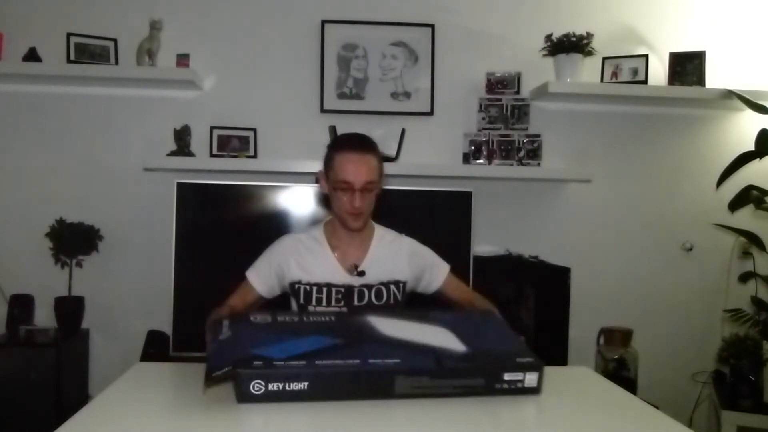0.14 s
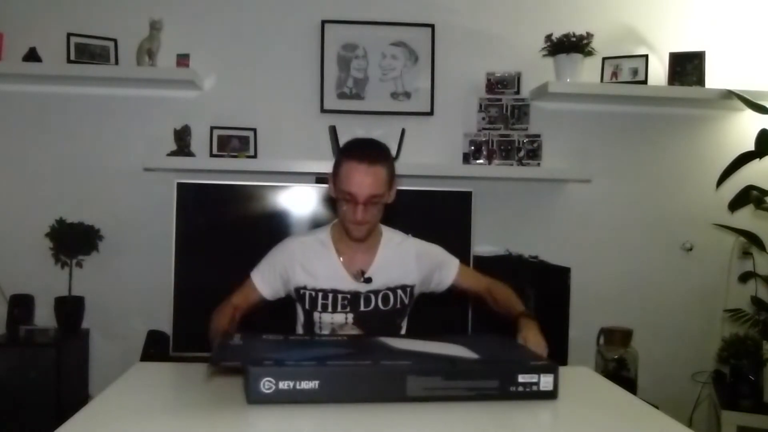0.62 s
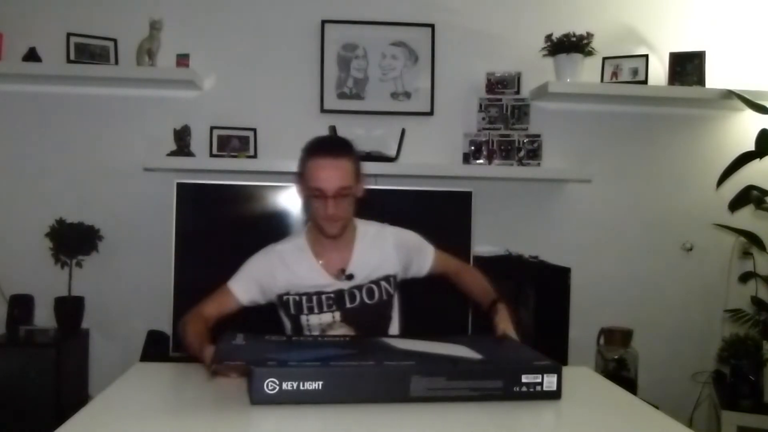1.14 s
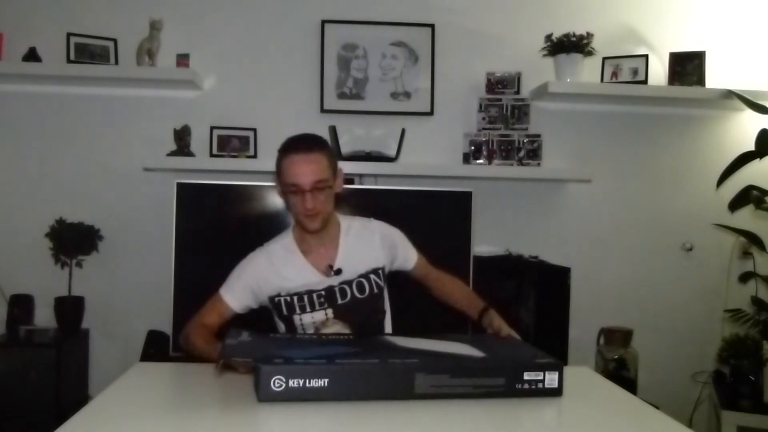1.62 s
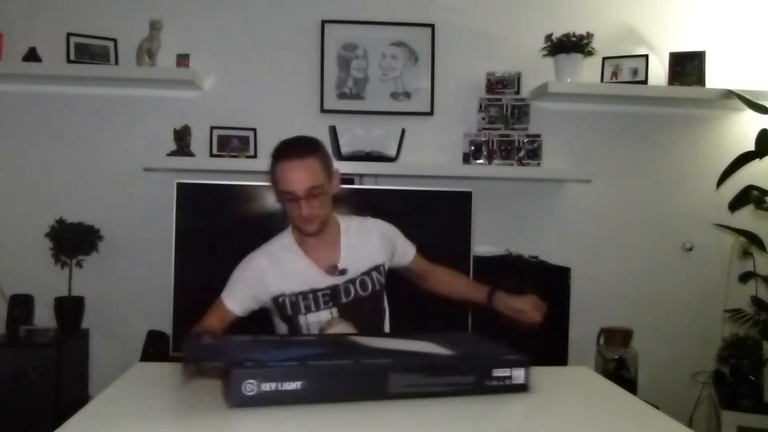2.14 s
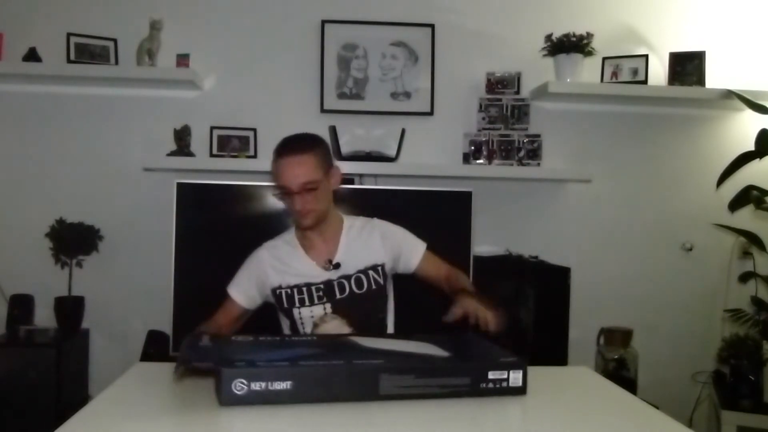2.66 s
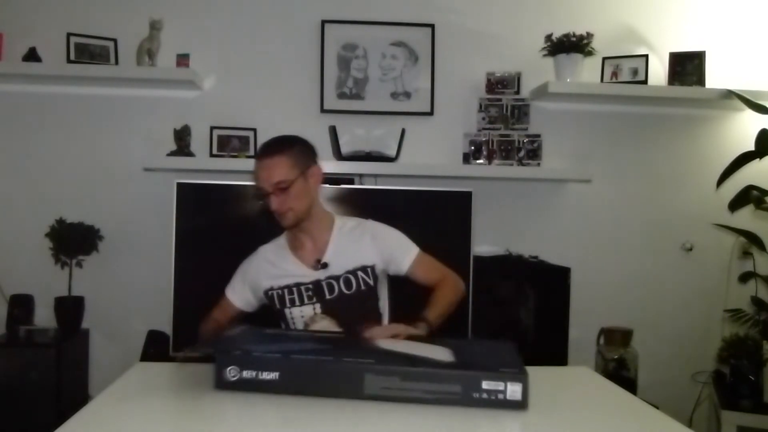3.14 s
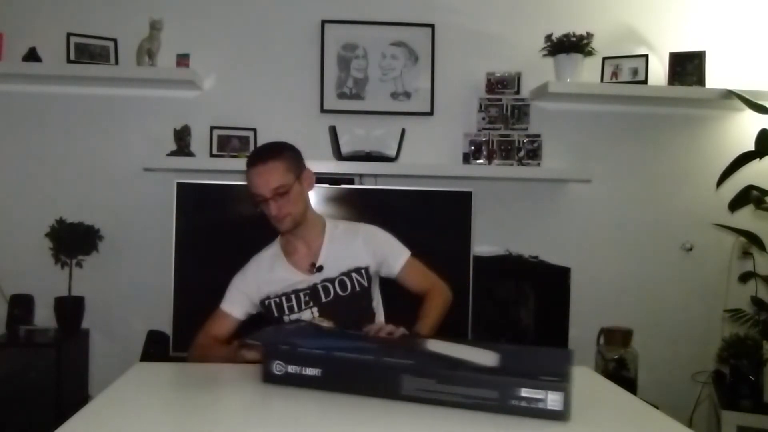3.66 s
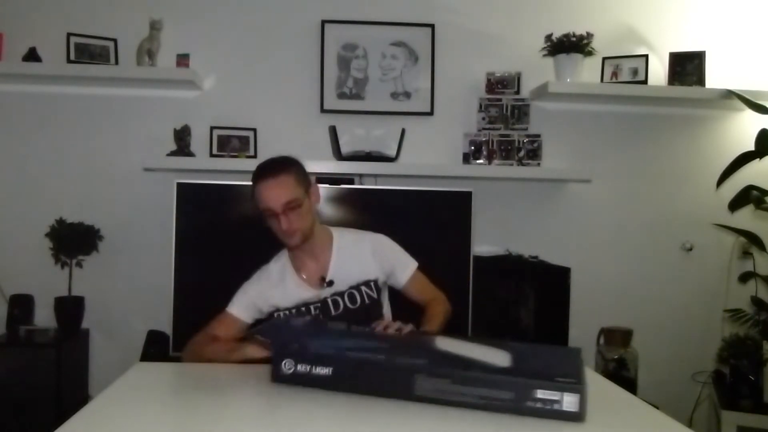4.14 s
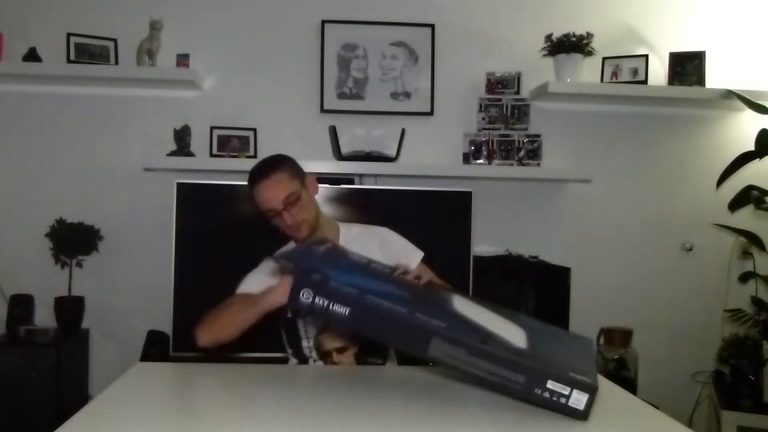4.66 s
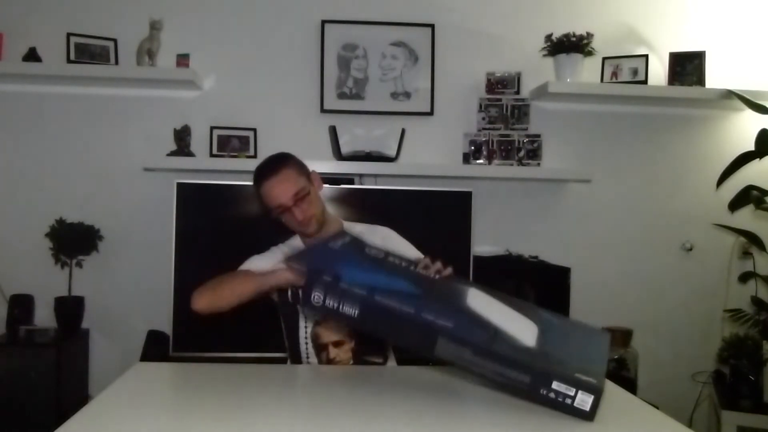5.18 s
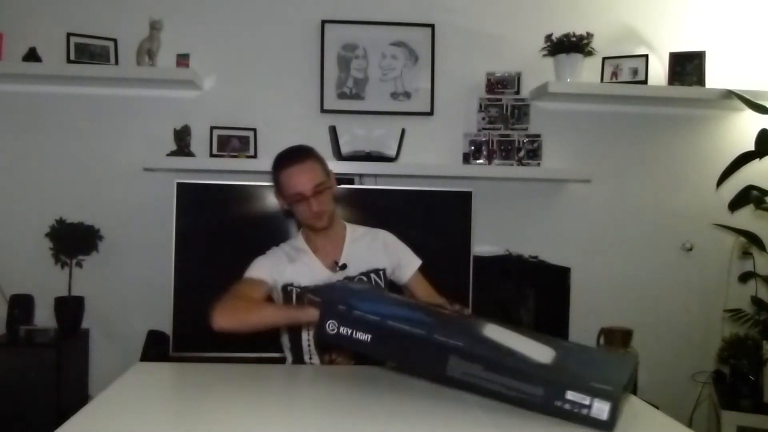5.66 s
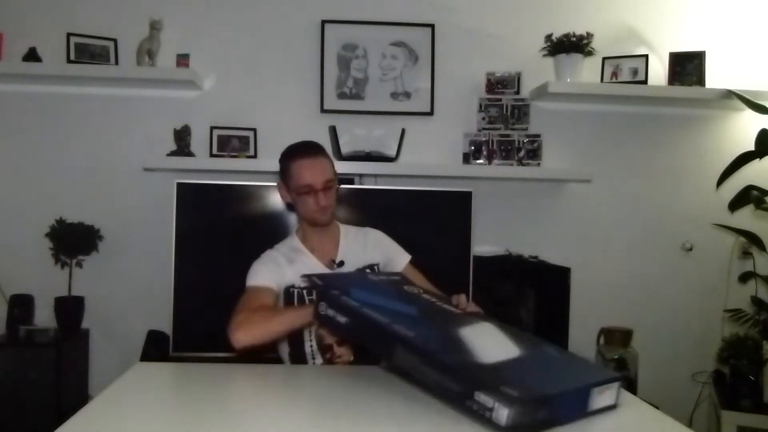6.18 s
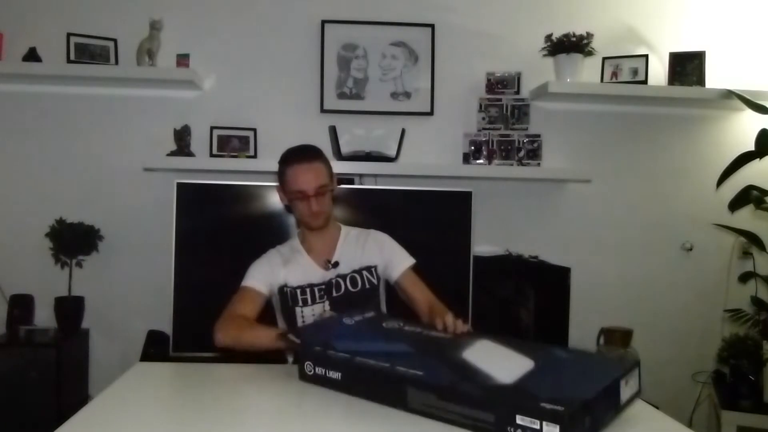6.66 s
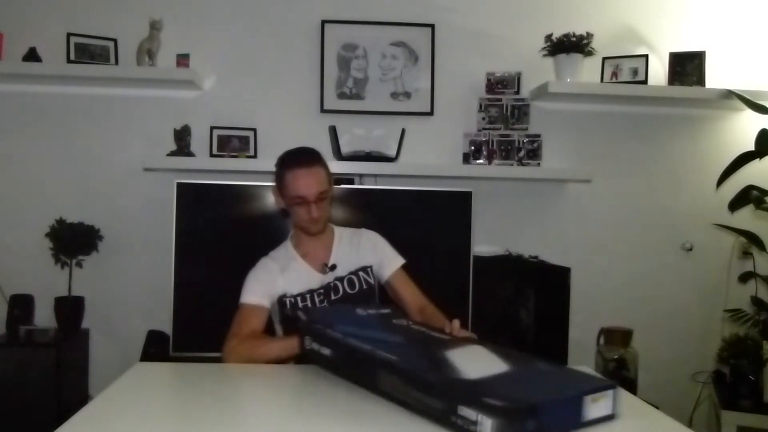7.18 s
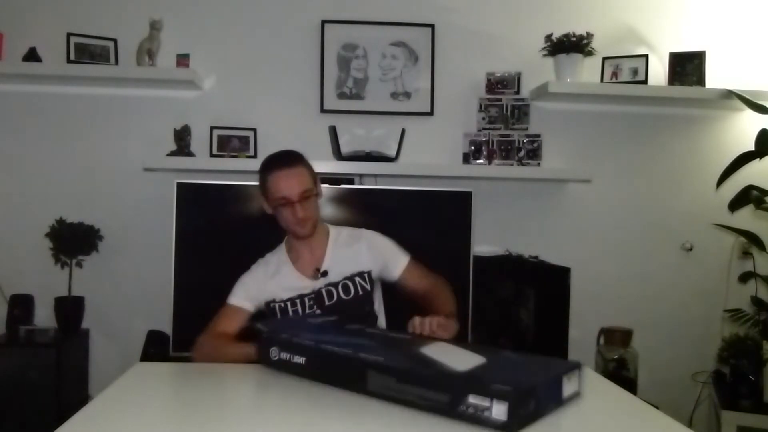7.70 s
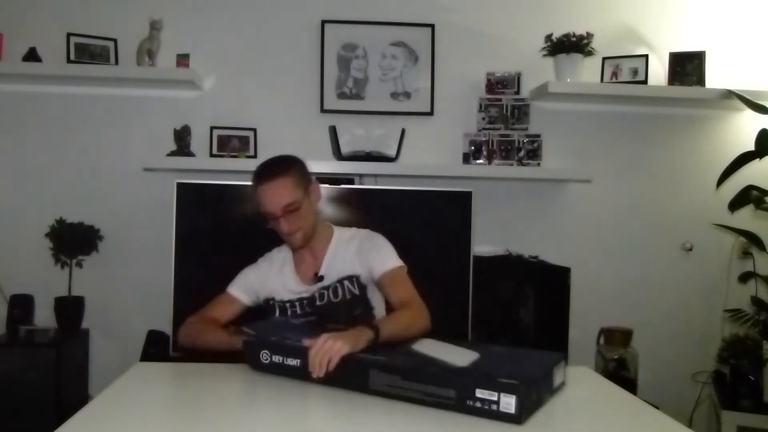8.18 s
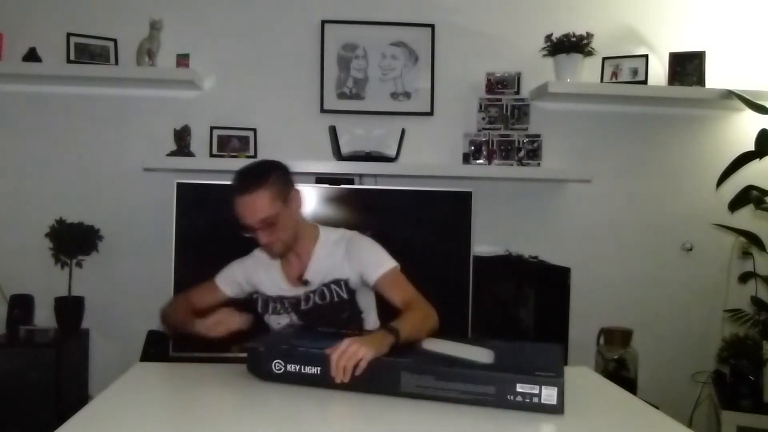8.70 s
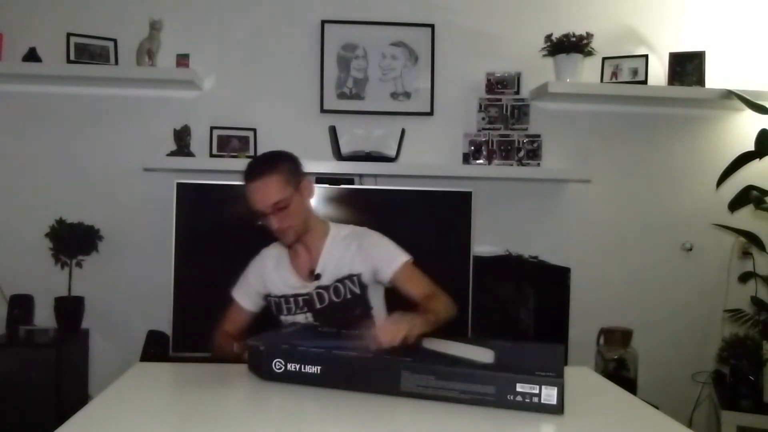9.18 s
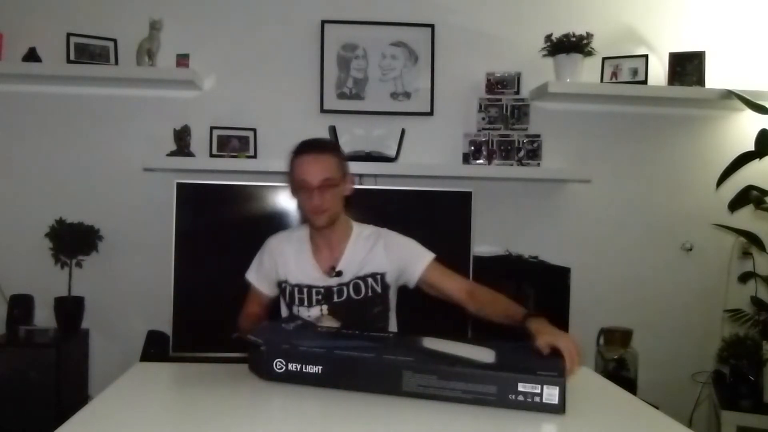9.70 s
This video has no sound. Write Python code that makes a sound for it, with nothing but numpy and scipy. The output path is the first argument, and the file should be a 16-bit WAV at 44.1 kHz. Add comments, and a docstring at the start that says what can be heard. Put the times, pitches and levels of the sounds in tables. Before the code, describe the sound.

A large flat cardboard box is handled on a table, heard close through a small microphone in a softly furnished room with short, faint echo and low hush. At 0 s it lands with a sharp hollow knock and a dry scrape, with lesser knocks at 0.5 s. From 0.7 to 1.9 s only soft rubs and ticks. A double knock comes at 2.0 s, then hissy sliding. Around 3.0-3.5 s taps and skids cluster, with a snap at 3.7 s. After a lull, scuffs and a hard knock at 4.8 s lead to papery skids and knocks at 5.15 and 5.6 s. A loud rasping tug and crack hit at 6.1 s, then knocks at 6.7 s and steady sliding to 8 s. Taps at 8.1-8.3 s precede the loudest event, a heavy hollow multi-part thump at 8.6 s. Quiet taps, scuffs and fading rubs finish by 9.8 s.

```python
"""Knocks, scrapes and skids of a large flat cardboard box laid down, pushed about, tilted and tugged open
on a living-room table; its load thumps down once. Sliding is sparse random catches filtered into rumble,
drone, rasp and hiss. Blows and skids are noise forces that ring the panels, walls, flaps and edges.
A small clip-on microphone close by hears it with a little room and a faint hush."""
import sys
import numpy as np
from scipy import signal
from scipy.io import wavfile

SR = 44100
rng = np.random.default_rng(int(sys.argv[2]) if len(sys.argv) > 2 else 0)


def master_out(mix):
    """Clip the mix to full scale and print it as 16-bit PCM to the path in sys.argv[1]."""
    frames = np.transpose(np.atleast_2d(mix))
    ceiling = np.clip(frames, -1, 1)
    pcm = np.round(ceiling * 32767).astype(np.int16)
    wavfile.write(sys.argv[1], SR, pcm)


def rack_gain(trim_db):
    """Turn a fader trim in dB into the linear factor to multiply a signal by."""
    fader = np.asarray(trim_db, float)
    return 10 ** (fader / 20)


N = 433503


def rms_one(x):
    """Scale to unit rms."""
    return x / np.sqrt(np.mean(x ** 2) + 1e-20)


def drift(rate_hz):
    """Slow random wander of rms 1: noise through two one-pole low-passes at rate_hz."""
    thin = 40  # samples per point of the wander
    warm_up = 2000
    pole = np.exp(-2 * np.pi * thin * rate_hz / SR)
    noise = rng.standard_normal(N // thin + 2 + warm_up)
    slow = signal.lfilter([1], [1, -2 * pole, pole ** 2], noise)[warm_up:]
    return np.interp(np.arange(N) / thin, np.arange(len(slow)), rms_one(slow))


def coloured(streams, spectrum, patchy_db):
    """Half-octave bands of two alternating streams, flickering partly together and partly alone; rms 1."""
    hz, level_db = np.transpose(spectrum)
    octaves = np.log2(hz[-1] / hz[0])
    edges = hz[0] * 2 ** np.arange(0, octaves + .5, .5)
    together = drift(8.3)
    out = np.zeros(N)
    for k, (low, high) in enumerate(zip(edges, edges[1:])):
        band_pass = signal.butter(2, [low, high], "band", fs=SR, output="sos")
        # neighbouring bands get unrelated input
        band = signal.sosfilt(band_pass, streams[k % 2])
        centre_db = np.interp(np.log(low * high) / 2, np.log(hz), level_db)
        flicker_db = patchy_db * (0.78 * together + drift(11.5))
        out = out + band * rack_gain(centre_db + flicker_db)
    return rms_one(out)


def room_hush():
    """The hush of the room: steady noise, strongest in the bass."""
    # Spectrum of the hush. Each row: frequency in Hz, level per Hz in dB.
    spectrum = [(40, -5), (100, -0.5), (300, -2.5), (1000, -17.5), (3000, -21), (7000, -34), (11000, -30)]
    return rack_gain(-68.5) * coloured(rng.standard_normal((2, N)), spectrum, patchy_db=0.5)


def room(x):
    """A dense cloud of echoes from 9 ms on; soft furnishings leave its treble weaker, all at one decay rate."""
    bass_t60_s, treble_t60_s = 0.37, 0.37
    treble_db, split_hz = -8, 1280
    t = np.arange(round(.6 * SR)) / SR
    cloud = rng.standard_normal(len(t)) * (t > .009)
    bass = signal.sosfilt(signal.butter(1, split_hz, fs=SR, output="sos"), cloud)
    treble = cloud - bass
    tail = bass * rack_gain(-60 * t / bass_t60_s) + treble * rack_gain(treble_db - 60 * t / treble_t60_s)
    return signal.fftconvolve(x, tail / np.sqrt(np.sum(tail ** 2)))[:N]


def fibres(per_s, size_db):
    """Two streams of tiny stick-slip catches of uneven size and random sign."""
    caught = rng.random((2, N)) < per_s / SR
    unevenness = np.minimum(rng.exponential(1, (2, N)), 5)
    sizes = rack_gain(size_db * unevenness) * rng.choice([-1, 1], (2, N))
    return caught * sizes + 1e-9


def strokes():
    """Pushes and tugs, some overlapping, some with pauses between: rasp gain, hiss gain, swing in dB."""
    # Slides of card. Each row: start in seconds, length in seconds, rasp level in dB,
    # swell from start to end in dB, gloss (skin hiss over rasp) in dB.
    slides = [(0.0, 0.41, -47.5, -4, -3), (0.452, 0.35, -53, 0.5, -5), (0.784, 0.38, -62, -9, -8.5),
              (1.135, 0.28, -62.5, 1, -8), (1.3, 0.1, -57.5, 2, -5), (1.399, .25, -54, -5.5, -4.5),
              (1.691, 0.23, -55.5, 10, -6.5), (2.043, 0.26, -48.5, -9, -1), (2.324, 0.11, -51.5, 3, -10.5),
              (2.464, 0.13, -65, -13, -3), (2.53, 0.46, -50, 4.5, 0.5), (3.004, 0.16, -52, 0, 1),
              (3.112, 0.25, -47, 1.5, 2), (3.29, 0.21, -47, -1, -1.5), (3.405, 0.41, -50, -3, 1),
              (3.85, 0.091, -49.5, -13, -13), (4.09, 0.24, -56, -1.5, -2.5), (4.4, 0.4, -68, 10, -9),
              (4.669, 0.26, -54, 10, -10.5), (4.84, 0.29, -60.5, 5, -5), (5.09, 0.26, -55, -7, -9.5),
              (5.362, 0.33, -59.5, -9, -4), (5.588, 0.24, -43, -2.5, -4), (5.77, 0.29, -47.5, 7, 0.5),
              (6.009, 0.13, -34.5, 14.5, -9.5), (6.143, 0.26, -46.5, 3, -4), (6.36, 0.2, -41, -1.5, -6),
              (6.503, 0.18, -52.5, -8, -3), (6.647, 0.55, -53, -13.5, -7), (6.915, 0.23, -47, 3, -2),
              (7.093, 0.37, -45, 1, -1.5), (7.46, 0.29, -49.5, -8, -1), (7.696, .26, -45.5, -6.5, -3.5),
              (7.964, 0.18, -51, -2, -12), (8.146, 0.14, -49, 6, -2.5), (8.332, 0.25, -50.5, -7, -1.5),
              (8.572, 0.13, -37.5, 5, -5), (8.728, 0.18, -62, -15, 9), (9.03, 0.1, -68.5, 3, -7),
              (9.29, 0.09, -57, 4, -16), (9.395, 0.58, -59.5, -11, -11.5)]
    grip_s, let_go_s = 0.041, 0.073  # longest pick-up and dying-away times
    edge_drop_db = 9  # how far a slide is down at its start and end
    rest_db = -81.5  # faint creep of card between slides
    t = np.arange(N) / SR
    rasp, hiss, shape = rack_gain(rest_db), rack_gain(rest_db), rack_gain(-2 * edge_drop_db)
    for start, length, db, swell_db, gloss_db in slides:
        grip, let_go = min(grip_s, length / 3), min(let_go_s, length / 2)
        rise, fall = (t - start) / grip, (start + length - t) / let_go
        # 0 at the start and end, 1 in full motion; the fades run on a little outside
        moving = np.clip(np.minimum(rise, fall), -2, 1)
        edge = rack_gain(edge_drop_db * (moving - 1)) * (moving > -2)
        progress = np.clip((t - start) / length, 0, 1)
        level = edge * rack_gain(db + swell_db * (progress - .5))
        rasp = np.hypot(rasp, level)
        hiss = np.hypot(hiss, level * rack_gain(gloss_db))
        shape = np.maximum(shape, edge)
    return rasp, hiss, 20 * np.log10(shape)


def sliding():
    """Catching fibres shake the table, the hollow walls, the flutes and the skin of the card."""
    # How hard the box bears on the table, before the lows follow the slides.
    # Each row: time in seconds, wall drone in dB, table rumble over drone in dB.
    bearing = [(0.0, -52.5, -18), (.6, -57.5, -10), (1.1, -63, -15), (1.9, -65, 2.5), (2.3, -56.5, -3),
               (2.9, -61, -13), (3.3, -60, 0), (3.9, -67.5, -10), (4.25, -63.5, 12), (4.6, -65.5, -6),
               (5.1, -58, 6.5), (5.65, -59, 0), (6.1, -49.5, -12.5), (6.5, -54, -14), (6.87, -54, -1),
               (7.3, -55, -14.5), (7.9, -62, -4), (8.4, -59.5, -5), (8.65, -50, 0), (8.95, -64.5, -8),
               (9.4, -54, -1), (9.83, -63.5, 2.5)]
    # Friction colours of table, walls, flutes and skin. Each row: frequency in Hz, level per Hz in dB.
    rumble_colour = [(30, -13), (50, -1.5), (100, -2.5), (200, -2.5), (320, -42)]
    drone_colour = [(140, -18.5), (260, -3.5), (500, -3), (800, -5), (1200, -11)]
    rasp_colour = [(600, -19.5), (1000, 0), (1700, 0), (2500, 2.5), (3600, -13.5)]
    hiss_colour = [(2000, -27), (3300, 8.5), (5000, 6), (7000, 3.5), (9000, -6), (11000, -15)]
    lows_follow = 0.37  # share of a slide's rise and fall (in dB) that drone and rumble follow

    rasp_gain, hiss_gain, shape_db = strokes()
    s, wall_db, table_db = np.transpose(bearing)
    t = np.arange(N) / SR
    drone_db = np.interp(t, s, wall_db) + lows_follow * shape_db
    rumble_db = drone_db + np.interp(t, s, table_db)

    rumble = coloured(fibres(150, 6.6), rumble_colour, patchy_db=4.5)
    drone = coloured(fibres(900, 3.17), drone_colour, patchy_db=2.0)
    rasp = coloured(fibres(5000, 3.3), rasp_colour, patchy_db=2.0)
    hiss = coloured(fibres(15000, 3.87), hiss_colour, patchy_db=1.23)
    return rack_gain(rumble_db) * rumble + rack_gain(drone_db) * drone + rasp_gain * rasp + hiss_gain * hiss


def ring(modes, t):
    """Decaying sines of one box part: strengths and pitches vary by chance; neighbours swing oppositely."""
    detune, strength_spread_db = .06, 2.5  # the grip shifts each pitch by this fraction (one sigma)
    hz, level_db, t60 = np.transpose(modes)[:, :, None]
    strength_luck, pitch_luck = rng.standard_normal((2, len(modes), 1))
    sign = (-1.) ** np.arange(len(modes))[:, None]
    height = sign * rack_gain(level_db + strength_spread_db * strength_luck - 60 * t / t60)
    sound = np.sum(height * np.sin(2 * np.pi * hz * (1 + detune * pitch_luck) * t), axis=0)
    # each part of the box radiates little outside the span of its own modes
    span = [.6 * hz.min(), 1.6 * hz.max()]
    return signal.sosfilt(signal.butter(2, span, "band", fs=SR, output="sos"), sound)


def contacts(rows, force):
    """Each contact force excites the four families of modes in panels, walls, flaps and edges."""
    # What the box rings with. Each row: frequency in Hz before detuning, relative level in dB,
    # t60 in seconds.
    panels = [(49.3, -2.5, 0.18), (69.5, 3.5, 0.074), (89, -5, .08), (126, 15, 0.024), (152, -13, 0.078),
              (177, 6, 0.028)]
    walls = [(235, -5, .035), (280, -5, .032), (355, -3, .03), (460, -1, .028), (545, 0, .027),
             (700, 0, .024)]
    flaps = [(820, -3, .016), (920, -2, .015), (1100, 0, .014), (1280, 0, .012), (1450, 0, .011),
             (1640, 0, .01)]
    edges = [(2000, 0, .006), (2400, -1, .006), (2900, 0, .005), (3400, 0, .004), (4400, -1, .0035),
             (5300, -3, .003), (6500, -7, .0025), (8700, -14, .002)]
    # Loudness of a ring over its contact level in dB: panels, walls, flaps, edges.
    ring_trims_db = [-5, -7, -13.5, -9.5]
    t = np.arange(round(.15 * SR)) / SR
    out = np.zeros(N + len(t))
    for s, db, weight_db, sharp_db, hollow_db, ms in rows:
        push, at = force(t, ms), round(s * SR)
        shares_db = (weight_db, hollow_db, 0, sharp_db)
        for modes, share_db, trim_db in zip((panels, walls, flaps, edges), shares_db, ring_trims_db):
            sound = signal.fftconvolve(push, ring(modes, t))[:len(t)]
            # a level is the energy of the contact spread over 20 ms
            loudness = np.sqrt(np.sum(sound ** 2) / (.02 * SR))
            out[at:at + len(t)] += rack_gain(db + share_db + trim_db) * sound / loudness
    return out[:N]


def scuff_force(t, length_ms):
    """Uneven fibre catches under a swell, softened in the treble as a spread-out contact is."""
    swell = np.sin(np.pi * np.clip(1000 * t / length_ms, 0, 1)) ** 1.5
    catches = (rng.random(len(t)) < 1500 / SR) * rack_gain(1.8 * rng.exponential(1, len(t)))
    rough = swell * (catches + 0.35) * rng.standard_normal(len(t))
    return signal.sosfilt(signal.butter(1, 3000, fs=SR, output="sos"), rough)


def scuffs():
    """Short skids of a hand or flap: the rubbing force makes the box parts ring."""
    # Each row: start in seconds, strength in dB, weight (panels) and sharpness (edges)
    # over strength in dB, length in ms.
    skids = [(0.069, -27, -13, -20, 28), (0.339, -31.5, -16.5, -4, 36), (0.72, -43.5, -7.5, -12, 14),
             (0.814, -45, -16, -8, 22), (0.922, -38.5, -15, -8, 42), (1.248, -42, -10, -16, 12.7),
             (2.054, -50, 15, 9, 24.5), (2.994, -27, -19, -9, 30), (3.014, -33, -19, 3, 22),
             (3.164, -30.5, -16, -18, 37), (3.221, -31, -26, -26, 18), (3.414, -30.5, -28, -4, 34),
             (3.681, -35, -8.5, -0.5, 17), (4.194, -51, -3, -14, 20), (4.384, -48.5, -20, -13, 18),
             (4.601, -62, -1, -9, 26), (4.72, -37, -27, -21, 45), (4.763, -30, -27, -29, 57),
             (4.798, -37, -3, -3.5, 55), (4.907, -27, -36, -14, 25), (4.967, -32.5, -33, -32, 28),
             (5.03, -30.5, -24, -18, 39), (5.108, -30, -31, -17, 21), (5.185, -40.5, -4, -10, 24),
             (5.254, -28.5, -25, -22, 19.3), (5.41, -45, 4, -2, 20), (5.577, -25.5, -12, -2.5, 42),
             (5.6, -20.5, -27, -31, 39), (5.774, -34, -38, -6, 20), (7.294, -39, -28, -3, 14),
             (7.72, -33.5, -3, -6.5, 39), (7.744, -35, -1, -9, 29), (8.134, -38, -5.5, -1, 29),
             (8.204, -49.5, -5, 8.5, 22), (8.614, -23, -18, -13, 54), (8.636, -28, 2, -16, 16),
             (8.704, -48, -8, -17, 27), (9.09, -48, 0, -15, 19), (9.148, -64.5, 22.5, 0, 11.4),
             (9.278, -40, -4, -4.5, 22), (9.385, -32.5, -24, -7, 27), (9.507, -32.5, -11.5, -14, 29),
             (9.768, -40.5, -18, -12, 16.5)]
    # the walls follow the weight in part, answering between flaps and panels
    rows = [(s, db, weight_db, sharp_db, -1 + 0.59 * weight_db, ms)
            for s, db, weight_db, sharp_db, ms in skids]
    return contacts(rows, scuff_force)


def knock_force(t, crunch_ms):
    """A sharp first touch, then a short crunch of card."""
    force = rng.standard_normal(len(t)) * np.exp(-1000 * t / crunch_ms)
    force[0] += 9.0
    return force


def knocks():
    """Sharp blows of hands, flaps and load: an impact and its crunch make the hollow box ring."""
    # Each row: start in seconds, strength in dB, then over strength in dB: weight as panel thud,
    # sharpness as edge snap, hollowness as wall knock.
    blows = [(0.059, -17, -14.5, -11, -6.5), (0.105, -27, -32, -6.5, -6), (0.454, -27.5, -9, -13.5, -9),
             (0.494, -38.5, -0.5, 0.5, -12), (0.539, -28, -6, -7.5, -6.5), (0.85, -41, -9, -4.5, -2),
             (1.001, -43, -26, -7.5, -2), (1.28, -43.5, -10, 0, -2), (1.429, -57.5, -10, 14.5, -6),
             (1.484, -36, -19, -15, -7.5), (1.611, -43.5, -25, -9, -16), (1.974, -44.5, -8, -4.5, 0.5),
             (2.034, -32.5, 1.5, -15, -1.5), (2.048, -24, -13, -9, -12), (2.321, -41, -17, -17, -6.5),
             (2.514, -45.5, -18, -2, -7), (2.986, -30.5, -17, -14, -7), (3.152, -37.5, -9, -14, -6),
             (3.183, -33.5, -19, -15, -1), (3.197, -29, -6.5, -17, -14), (3.215, -24, -41, -22, -17),
             (3.282, -39, 5, 0, 4), (3.377, -33, -22, -17, -11), (3.401, -32, -25, -7, -14),
             (3.457, -39, -23, -1, -2), (3.726, -25.5, -21, -2.5, -12), (3.819, -38, -11, -8, -5.5),
             (4.348, -53, -14, -13, 1.5), (4.475, -48, -19, -5, -7), (4.577, -46.5, -5, -13, -6),
             (4.823, -16.5, -24, -10.5, -14), (5.133, -28, -16, -17, -21), (5.153, -20, -15, -13, -17.5),
             (5.325, -34, -28, -17, -18), (5.389, -33, -18, -18, -13), (5.535, -46.5, -10, -6, -4),
             (5.591, -16, -16.5, -22, -10), (5.66, -27, -15, -2, -7.5), (5.826, -30.5, -30, -8, -22),
             (5.899, -26, -24, -10, -16), (6.142, -15.5, -40, -23, -9.5), (6.151, -15.5, -31, -5.5, -19),
             (6.673, -21.5, -25, -1.5, 2.5), (6.684, -23.5, -12.5, -13, -6), (6.718, -27, -15, -6, -7),
             (6.733, -33, -24, -20, -0.5), (6.923, -34.5, -8.5, -8, -8), (7.337, -49.5, -24, 17.5, -17),
             (7.413, -44, -29, 4.5, -16), (8.126, -41, -25, 3, 0), (8.135, -24, -13.5, -11.5, -7),
             (8.282, -28, -19, 7.5, -5), (8.575, -18.5, -4, -11.5, -2), (8.598, -9, -8, -17.5, -1.5),
             (8.606, -29, -4, -9, 1), (8.645, -24, 3, -11, -2), (8.652, -24.5, -6, -10, 2.5),
             (8.658, -19, -3.5, -3, 0), (8.671, -12.5, -23, -36, -13), (8.696, -19, -22, -14, -9.5),
             (8.755, -45.5, -34, 16, -14), (9.031, -51.5, -3, -26, -1), (9.204, -62, -2, -20, 3),
             (9.283, -32, -1.5, -22, -4), (9.326, -34, -35, -9, -22), (9.397, -43, -23, 8.5, -1),
             (9.431, -55.5, -6, -1, 6), (9.464, -31, -18, -20, -23), (9.722, -43.5, -17, -14, -17),
             (9.741, -55, -8, 6, -16)]
    crunch_ms = 2.8  # decay time constant
    return contacts([(*row, crunch_ms) for row in blows], knock_force)


def scene():
    """Box on table, its echo in the room, and the hush of the room."""
    hush = room_hush()
    box = sliding() + scuffs() + knocks()
    echo = rack_gain(-13.0) * room(box)
    return (box + echo + hush)[None]


def roll_off(x):
    """The treble ends steeply here."""
    return signal.sosfilt(signal.butter(12, 11070, fs=SR, output="sos"), x)


def record(dry):
    """The capsule has a narrow dip near its top and rolls off above it and in the deep bass."""
    dip_hz, dip_width_hz, dip_depth = 8050, 800, .7  # depth: fraction taken out at the centre
    b, a = signal.iirpeak(dip_hz, dip_hz / dip_width_hz, fs=SR)
    dipped = dry - dip_depth * signal.lfilter(b, a, dry)
    no_top = signal.sosfilt(signal.butter(6, 8780, fs=SR, output="sos"), dipped)
    mix = signal.sosfilt(signal.butter(4, 44, "high", fs=SR, output="sos"), no_top)
    return roll_off(mix)


dry = scene()
out = record(dry)
master_out(out)
```